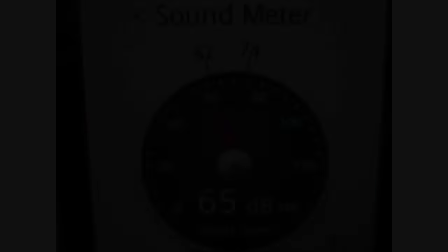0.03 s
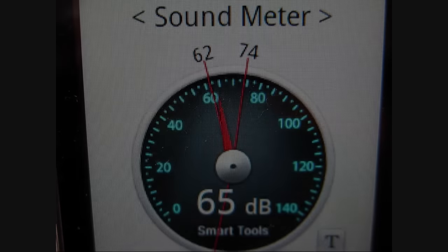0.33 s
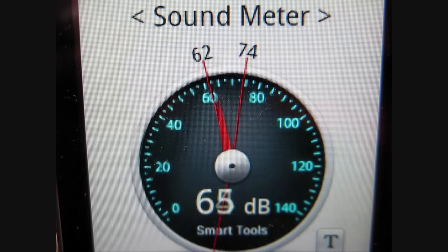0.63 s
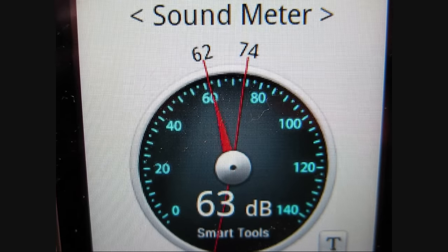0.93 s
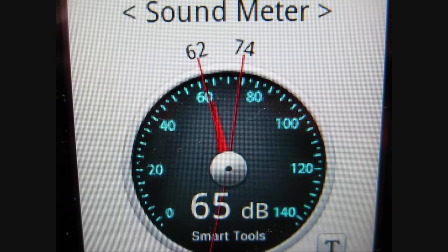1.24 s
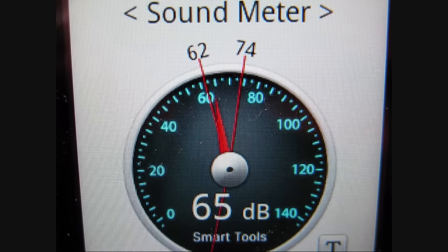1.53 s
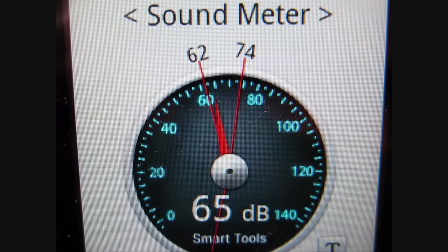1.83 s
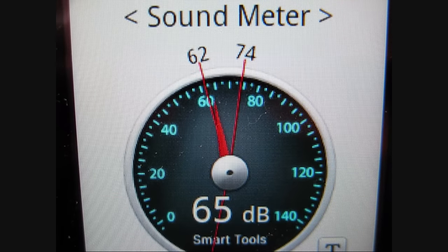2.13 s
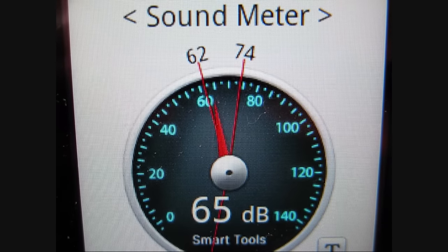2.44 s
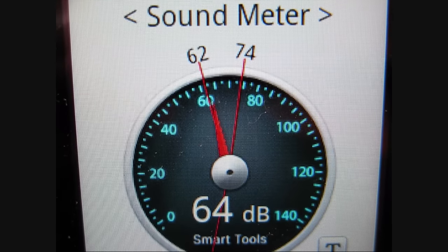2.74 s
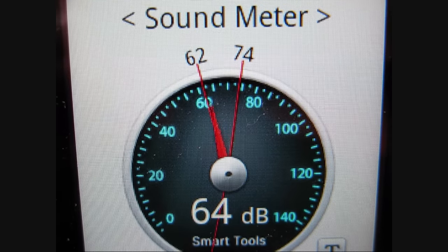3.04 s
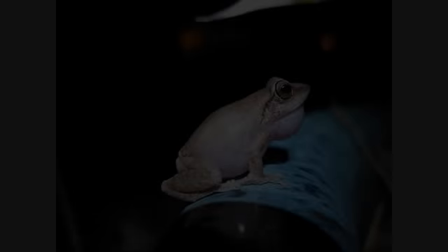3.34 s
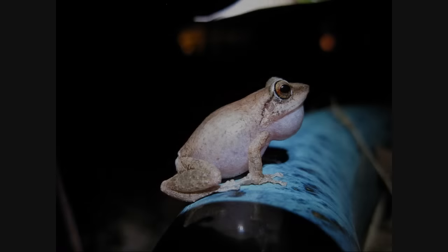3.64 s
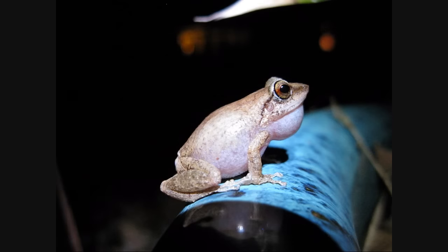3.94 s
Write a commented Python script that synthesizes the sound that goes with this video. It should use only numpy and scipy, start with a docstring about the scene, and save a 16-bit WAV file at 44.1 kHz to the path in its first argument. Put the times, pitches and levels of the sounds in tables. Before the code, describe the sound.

A chorus of tree frogs fades in outdoors at night over shrill insects. One frog right at the microphone gives a low note and a rising whistle. The sound cuts off, then fades back in with fewer insects.

```python
"""A shrill band of insects and a chorus of tree frogs fade in, out among the foliage at night.
The frogs have a low flat note and a rising whistle; the insects chirp quickly, each on its own pitch.
One frog calls right at the microphone, its vocal sac snapping, and the chorus dips under its two notes.
Neighbours answer through the leaves a few metres off, and many more blur together in the distance.
The sound cuts off, then fades in again at a spot with fewer insects."""
import sys
import numpy as np
from scipy import signal
from scipy.fft import rfft, irfft
from scipy.io import wavfile

SR = 44100
rng = np.random.default_rng(int(sys.argv[2]) if len(sys.argv) > 2 else 0)


def to_wav(s):
    """Save 16-bit WAV."""
    ch = np.atleast_2d(s).T  # columns
    pcm = np.round(np.clip(ch, -1, 1) * 32767)  # PCM
    wavfile.write(sys.argv[1], SR, pcm.astype(np.int16))


N = 176400

# the frog at the microphone, course of its low note: t/s, f/Hz, level/dB
CLOSE_LOW_CURVE = [(1.055, 1532, -27), (1.078, 1589, -31.5), (1.145, 1544, -30), (1.168, 1521, -24.5),
                   (1.189, 1510, -40)]
# harmonics of that note, fundamental first: level/dB
CLOSE_LOW_HARMONICS = [1.5, -6, -7.5, -19, -42, -32, -41.5]
# course of its whistle: t/s, f/Hz, level/dB
CLOSE_WHISTLE_CURVE = [(1.297, 2068, -35.5), (1.302, 2251, -25), (1.316, 2446, -31), (1.334, 2647, -28),
                       (1.376, 2867, -20.5), (1.418, 2976, -20.5), (1.44, 3006, -18.5), (1.462, 2982, -20),
                       (1.48, 2957, -18), (1.491, 2920, -50.5)]
# snaps of its vocal sac as notes open and close: t/s, f/Hz, rise/s, decay/s, level/dB
SAC_SNAPS = [(1.0545, 3058, 0.0014, 0.0039, -10.5), (1.176, 3030, 0.0067, 0.0031, -14.5),
             (1.297, 2140, 0.0029, .005, -19.5)]
# the click within each snap: f/Hz, relative level/dB
CLICK_SPECTRUM = [(700, -35.5), (1500, -6), (3000, 0.5), (6500, -13.5), (13000, -45.5)]
# neighbours' whistles: t/s, length/s, first f/Hz, top f/Hz, level/dB, directness/dB
NEAR_WHISTLES = [(0.187, 0.17, 2793, 3247, -22, -15), (0.409, 0.14, 2533, 2963, -24, 3.5),
                 (0.62, 0.15, 2437, 2914, -24.5, 4.5), (0.914, .12, 2392, 2664, -28, 3),
                 (1.5, 0.1, 2698, 2918, -23.5, 0.5), (1.762, 0.13, 2560, 2868, -24, 8.5),
                 (1.962, 0.11, 2737, 3168, -30.5, 2), (2.235, .14, 2438, 2896, -28, -2.5),
                 (2.311, 0.13, 2493, 2826, -31.5, 6), (2.437, .13, 2457, 2954, -25, 2.5),
                 (2.658, 0.13, 2749, 3283, -25, -1.5), (3.068, 0.13, 2381, 2910, -21.5, 3.5),
                 (3.501, 0.15, 2312, 2713, -29, -8), (3.53, 0.11, 2628, 3062, -29.5, -2),
                 (3.588, 0.11, 2675, 2927, -27.5, 2), (3.789, 0.14, 2427, 2785, -27.5, 3),
                 (3.871, 0.081, 2482, 2830, -24.5, 9), (3.961, 0.081, 2546, 2907, -29, 7)]
# neighbours' low notes: t/s, length/s, f/Hz, level/dB
NEAR_LOW_NOTES = [(0.141, 0.07, 1594, -35.5), (0.386, 0.073, 1538, -41.5), (.635, 0.13, 1484, -43),
                  (0.755, 0.079, 1569, -43), (1.218, 0.1, 1585, -48.5), (1.527, 0.11, 1558, -46.5),
                  (1.971, 0.12, 1617, -38.5), (2.03, 0.1, 1541, -34), (2.22, 0.087, 1515, -45),
                  (2.521, 0.13, 1598, -43.5), (2.821, .13, 1492, -32), (2.861, 0.17, 1636, -41.5),
                  (3.633, 0.091, 1550, -37.5), (3.702, 0.11, 1687, -34.5), (3.837, 0.11, 1478, -28)]
# thin high peeps in the leaves: t/s, length/s, f/Hz, level/dB
NEAR_PEEPS = [(2.065, 0.031, 3820, -38), (2.377, 0.15, 3380, -42.5), (3.175, 0.024, 3360, -29.5),
              (3.465, 0.02, 3810, -44), (3.588, 0.043, 3910, -43.5)]
# single insects: f/Hz, relative level/dB
INSECT_TONES = [(5303, -18.5), (5401, -14.5), (5472, -2.5), (5560, -9), (5608, 3.5), (5675, 0.5), (5722, 3),
                (5825, -15.5)]
# the distant swarm: f/Hz, relative level/dB
SWARM_SPECTRUM = [(3500, -61), (4400, -32), (5200, -24), (5430, -18), (5650, -1), (5900, -9.5),
                  (6100, -25.5), (7000, -40.5), (9900, -55.5), (10700, -46), (11400, -46), (12200, -63.5),
                  (14600, -54), (15500, -70)]
# rasp around the chorus tones: offset from the tone/Hz, relative level/dB
RASP_SPECTRUM = [(400, 0.5), (1100, -6.5), (2000, -14), (4000, -27), (8000, -61.5)]
# background hiss: f/Hz, relative level/dB
HISS_SPECTRUM = [(25, -29.5), (50, -17), (95, -5), (350, -4.5), (700, -0.5), (1900, -6), (8000, -12.5),
                 (12000, -16.5), (15700, -26)]
# dip in the chorus under the close frog: t/s, level/dB
CHORUS_DIP = [(1.053, 0), (1.062, -15), (1.09, -26), (1.15, -17), (1.208, -15), (1.217, -3.5), (1.295, 1),
              (1.315, -18), (1.38, -28.5), (1.46, -30.5), (1.5, -20.5), (1.54, -8), (1.6, 0)]
# two fade-ins with a cut between them: t/s, level/dB
FADES = [(.147, -100), (.153, -36), (.26, -21), (.5, -13), (.8, -7), (1.05, -5), (1.6, 0), (3.188, -0.5),
         (3.21, -100), (3.31, -100), (3.352, -44.5), (3.358, -31.5), (3.41, -21.5), (3.58, -11.5),
         (3.76, -10), (4, -2.5)]

CLOSE_WHISTLE_HARMONICS_DB, CLOSE_EDGE_S, BRIGHT_DECAY_S = [0.5, -34, -45.5, -63.5], 0.002, 0.028
WHISTLE_HARMONICS_DB, LOW_HARMONICS_DB = [0, -48, -42.5], [1, -19, -26.5]
WHISTLE_RISE_S, WHISTLE_SCOOP, WHISTLE_FLUTTER_DB = 0.14, 0.059, 2.5
WHISTLE_SNAP_S, WHISTLE_SNAP_DB = 0.0034, -17.5
LOW_CREST_S, LOW_SAG_PER_S2 = 0.0266, 3.98
FAR_CALLS_PER_S, FAR_TOP_HZ, FAR_LOW_HZ, FAR_SPREAD = 110, 2953, 1585, 0.055
CHIRPS_PER_S, INSECT_WAVER, CHIRP_GLIDE = 15, 0.003, 0.00816
SECOND_SPOT_S, SECOND_SPOT_DB = 3.28, -15.5
CLICK_DB, FAR_WHISTLES_DB, FAR_LOW_DB = -11.5, -33, -50
INSECTS_DB, SWARM_DB, RASP_DB, HISS_DB = -23, -27, -24.5, -53.5
FOLIAGE_T60_S, BAND_LIMIT_HZ = 0.44, 15750


def close_frog():
    """Right at the microphone: two nearly dry notes, the vocal sac snapping at their edges."""
    out = np.zeros(N)
    add(out, *close_note(CLOSE_LOW_CURVE, CLOSE_LOW_HARMONICS))
    add(out, *close_note(CLOSE_WHISTLE_CURVE, CLOSE_WHISTLE_HARMONICS_DB, bright_db=28.5))
    t = np.arange(SR // 20) / SR
    for start, hz, rise, decay, db in SAC_SNAPS:
        ring = np.minimum(t / rise, np.exp(-(t - rise) / decay)) * np.sin(2 * np.pi * hz * t)
        sharpness = CLOSE_EDGE_S / rise  # a faster snap clicks harder
        click = amp(CLICK_DB) * sharpness * noise(CLICK_SPECTRUM)[:len(t)] * np.exp(-t / decay)
        add(out, start, amp(db) * (ring + click))
    return foliage(out, wet_db=-15)[:N]


def close_note(curve, harmonics_db, bright_db=0):
    """Start time and sound of one close note; its overtones open bright_db up and settle."""
    times, hz, levels_db = np.transpose(curve)
    t = np.arange(times[0], times[-1], 1 / SR)
    lift_db = bright_db * np.exp(-(t - t[0]) / BRIGHT_DECAY_S)
    envelope = amp(np.interp(t, times, levels_db)) * gate(t - t[0], CLOSE_EDGE_S, CLOSE_EDGE_S)
    return t[0], envelope * voice(np.interp(t, times, hz), harmonics_db, lift_db)


def neighbours():
    """Frogs a few metres from the microphone, heard through the leaves."""
    out = np.zeros(N)
    for start, length, first_hz, top_hz, db, direct_db in NEAR_WHISTLES:
        call = whistle(length, first_hz, top_hz, direct_db)
        add(out, start, amp(db) * foliage(call, wet_db=1.5 - direct_db))
    for start, length, hz, db in NEAR_LOW_NOTES:
        add(out, start, amp(db) * foliage(low_note(length, hz, LOW_HARMONICS_DB), wet_db=-10.5))
    for start, length, hz, db in NEAR_PEEPS:
        add(out, start, amp(db) * foliage(low_note(length, hz, [0]), wet_db=-2.5))
    return out


def whistle(length, first_hz, top_hz, direct_db=0):
    """Scoops up and levels off; in clear line to the microphone it is brighter and snaps harder."""
    t = np.arange(0, length, 1 / SR)
    snap = np.exp(-t / WHISTLE_SNAP_S)
    arc_hz = top_hz - (top_hz - first_hz) * abs(1 - t / WHISTLE_RISE_S) ** 2.2
    hz = arc_hz * (1 - WHISTLE_SCOOP * snap)
    flutter = np.interp(t, np.linspace(0, 0.25, 32), rng.standard_normal(32))
    strength = amp(WHISTLE_FLUTTER_DB * flutter) + amp(WHISTLE_SNAP_DB + direct_db) * snap
    envelope = gate(t, attack_s=0.017, release_s=0.053) * strength
    return envelope * voice(hz, WHISTLE_HARMONICS_DB, direct_db)


def low_note(length, hz, harmonics_db):
    """A nearly flat note whose pitch sags toward its end."""
    t = np.arange(0, length, 1 / SR)
    sag = LOW_SAG_PER_S2 * (t - LOW_CREST_S) ** 2
    return gate(t, attack_s=0.0081, release_s=0.035) * voice(hz * (1 - sag), harmonics_db)


def far_frogs():
    """Many frogs of different sizes calling at random, blurred by distance."""
    whistles, lows = np.zeros((2, N + SR))  # a second's lead, so the chorus is already going
    for k, (jitter, *size) in enumerate(rng.uniform(-1, 1, (5 * FAR_CALLS_PER_S, 3))):
        start = (k + 2 * jitter) / FAR_CALLS_PER_S
        pitch_ratio = 1 + FAR_SPREAD * sum(size)
        top_hz = FAR_TOP_HZ * pitch_ratio
        add(whistles, start, whistle(length=0.13, first_hz=0.86 * top_hz, top_hz=top_hz))
        add(lows, start, low_note(length=0.1, hz=FAR_LOW_HZ * pitch_ratio, harmonics_db=[0]))
    return sum(amp(db) * unit_rms(foliage(calls, wet_db=15.5)[SR:SR + N])
               for calls, db in [(whistles, FAR_WHISTLES_DB), (lows, FAR_LOW_DB)])


def insects():
    """Each nearer insect chirps on its own pitch; the far ones merge into one shrill band."""
    t, out = np.arange(N) / SR, np.zeros(N)
    for hz, db in INSECT_TONES:
        drift = noise([(3, 0), (20, -6), (80, -60), (300, -150)])  # unsteadies timing and pitch
        rate = CHIRPS_PER_S * (1 + 0.15 * rng.uniform(-1, 1))
        cycle = (rate * t + rng.random() + 0.1483 * drift) % 1
        pitch = hz * (1 + INSECT_WAVER * drift + CHIRP_GLIDE * (0.5 - cycle))
        chirps = np.sin(np.pi * cycle) ** 4 * voice(pitch, harmonics_db=[0, -40])
        out += amp(db) * foliage(chirps, wet_db=-4)[:N]
    spot_gain = np.where(t > SECOND_SPOT_S, amp(SECOND_SPOT_DB), 1)
    return spot_gain * (amp(INSECTS_DB) * unit_rms(out) + amp(SWARM_DB) * noise(SWARM_SPECTRUM))


def foliage(call, wet_db):
    """Leaves and trunks scatter each call differently on its way to the microphone; energy is kept."""
    t = np.arange(24000) / SR
    tail = rng.standard_normal(len(t)) * amp(-60 * t / FOLIAGE_T60_S)
    out = signal.fftconvolve(call, tail)
    out *= amp(wet_db) * np.linalg.norm(call) / np.linalg.norm(out)
    add(out, 0, call)
    return out * np.linalg.norm(call) / np.linalg.norm(out)


def rasp(chorus):
    """A faint roughness that spreads to either side of the loud tones."""
    low_cut = signal.butter(2, 500, "high", fs=SR, output="sos")
    return amp(RASP_DB) * signal.sosfilt(low_cut, chorus * noise(RASP_SPECTRUM))


def background_hiss():
    """A soft, steady low hiss behind everything."""
    return amp(HISS_DB) * noise(HISS_SPECTRUM)


def voice(hz, harmonics_db, lift_db=0):
    """A tone that follows a pitch curve, its overtones raised by lift_db."""
    phase = 2 * np.pi * np.cumsum(hz) / SR
    return np.sqrt(2) * sum(amp(db + lift_db * (k > 1)) * np.sin(k * phase)
                            for k, db in enumerate(harmonics_db, 1))


def gate(t, attack_s, release_s):
    """Smooth attack, hold and release."""
    ramp = np.minimum(t / attack_s, (t[-1] - t) / release_s)
    return np.sin(np.pi / 2 * np.clip(ramp, 0, 1))


def noise(spectrum):
    """Noise of rms 1, shaped by points of f/Hz, level/dB."""
    hz, db = np.transpose(spectrum)
    shape_db = np.interp(np.log(np.fft.rfftfreq(N, 1 / SR) + 1), np.log(hz), db)
    return unit_rms(irfft(rfft(rng.standard_normal(N)) * amp(shape_db), N))


def gain_curve(points):
    """Gain over the whole scene from points of t/s, level/dB."""
    return amp(np.interp(np.arange(N) / SR, *np.transpose(points)))


def add(mix, start, sound):
    """Mixes a sound in at start seconds."""
    part = mix[max(round(start * SR), 0):][:len(sound)]
    part += sound[:len(part)]


def amp(db):
    """Decibels to gain."""
    return 10 ** (np.asarray(db) / 20)


def unit_rms(x):
    """Scales to rms 1."""
    return x / np.sqrt(np.mean(x ** 2) + 1e-20)


def scene():
    """One microphone in the foliage: the chorus dips under the close frog, over a steady hiss."""
    chorus = neighbours() + far_frogs() + insects()
    dipped_chorus = (chorus + rasp(chorus)) * gain_curve(CHORUS_DIP)
    return (dipped_chorus + close_frog() + background_hiss())[None]


def record(dry):
    """Fades in, cuts off and fades in again, with the highest treble removed."""
    low_pass = signal.firwin(511, BAND_LIMIT_HZ, window=("kaiser", 9), fs=SR)
    return signal.oaconvolve(dry * gain_curve(FADES), low_pass[None], "same")


dry = scene()
out = record(dry)
to_wav(out)
```